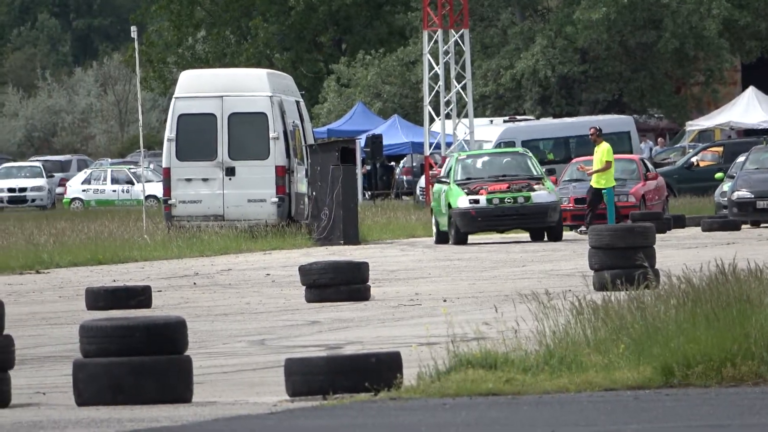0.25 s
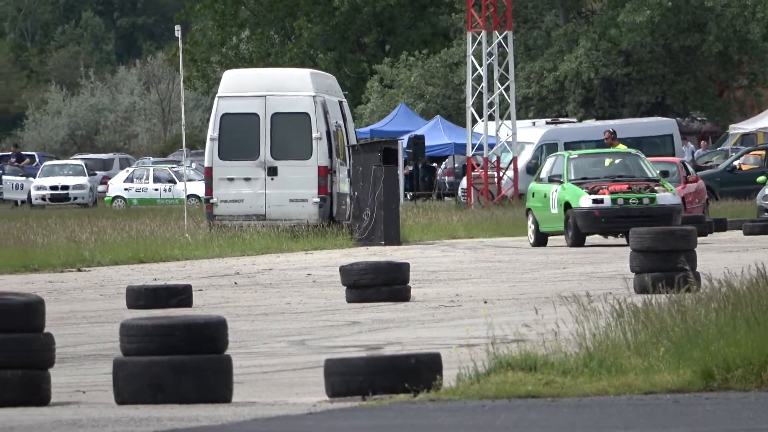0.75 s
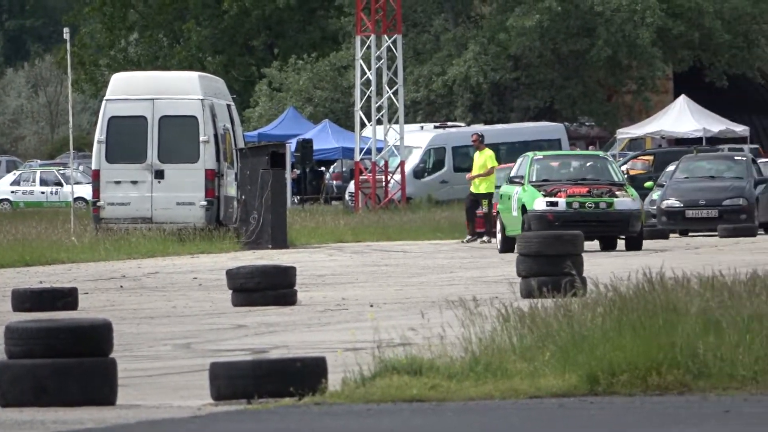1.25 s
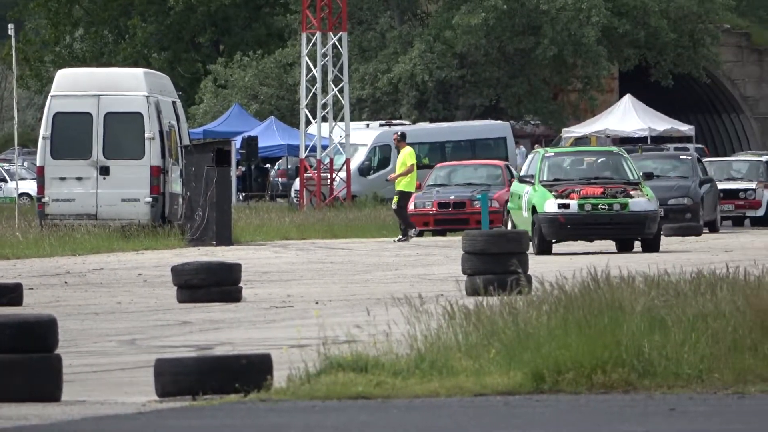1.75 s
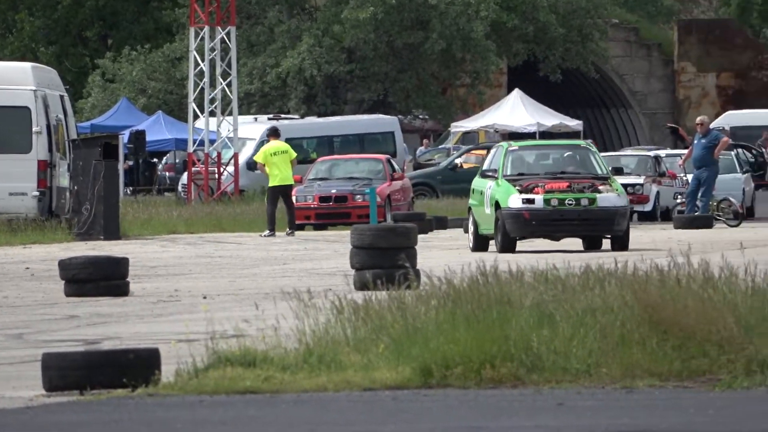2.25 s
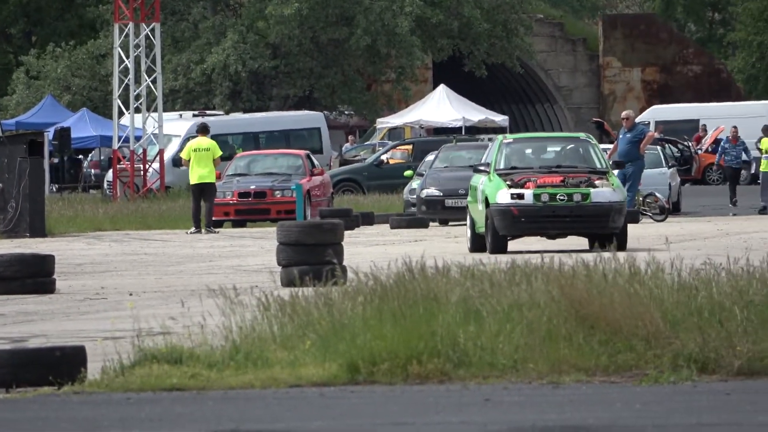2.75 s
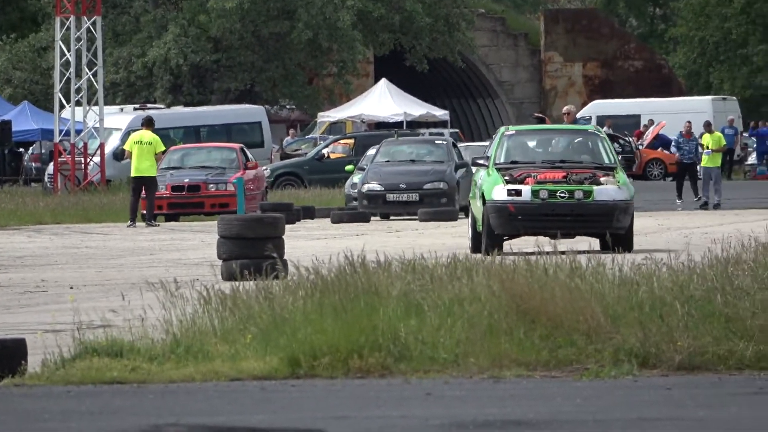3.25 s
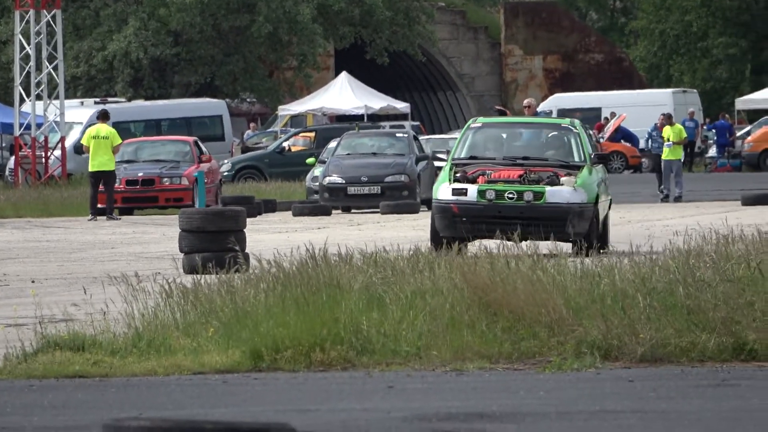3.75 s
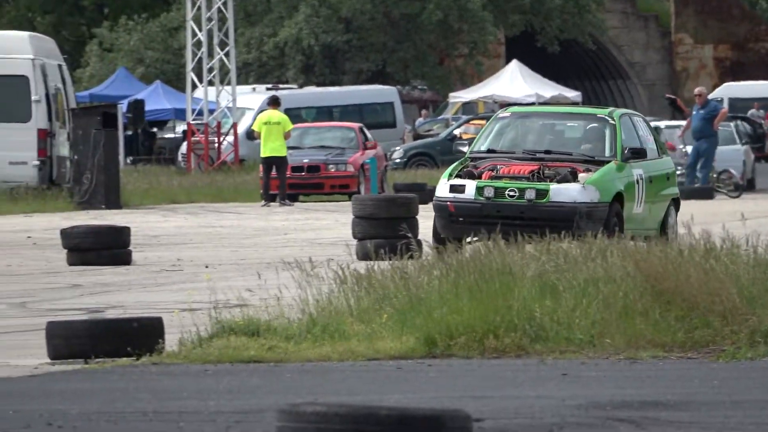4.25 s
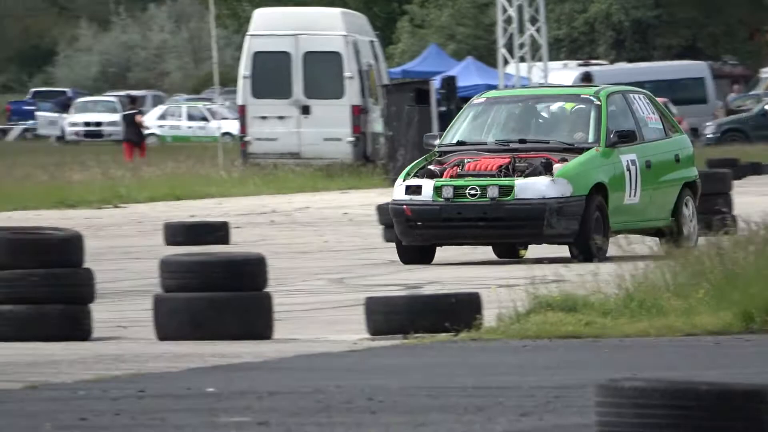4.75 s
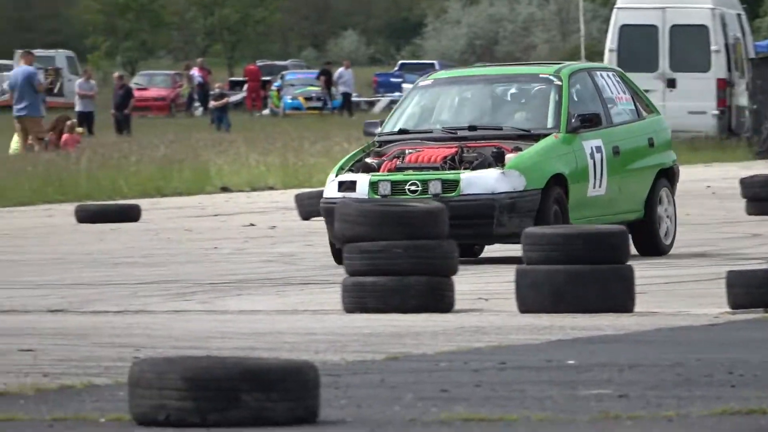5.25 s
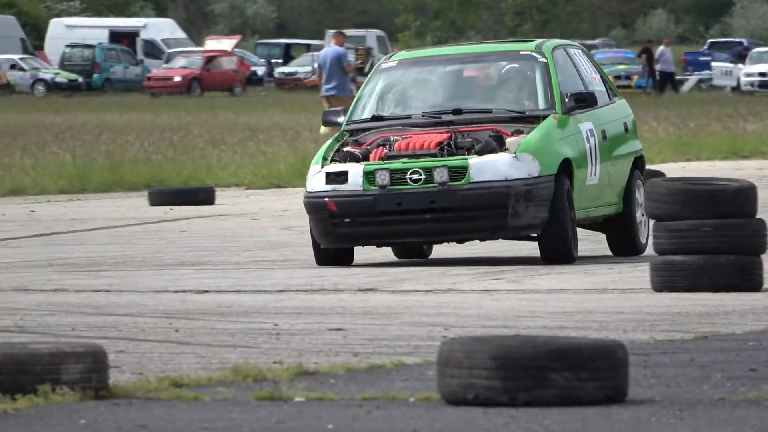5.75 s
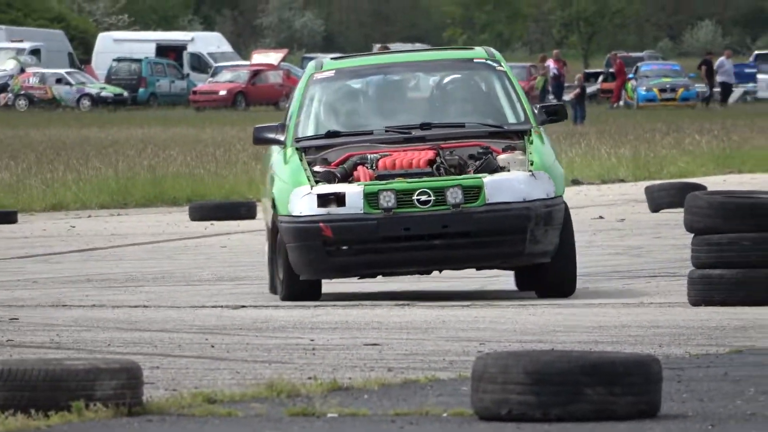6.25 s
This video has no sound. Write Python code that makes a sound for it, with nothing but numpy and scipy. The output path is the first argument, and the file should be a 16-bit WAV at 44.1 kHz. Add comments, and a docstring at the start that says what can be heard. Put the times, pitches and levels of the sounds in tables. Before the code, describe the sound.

Outdoors on an airfield, near-mono with slight stereo air: a raspy six-cylinder engine rises steadily, drops off, then accelerates again, much louder and fuller. After the lift it coasts nearer, its pitch falling unevenly, with gassy burble, valve clatter, air hiss and unsteady gear whine, broken by brief stabs of throttle. Idling engines rumble low behind; small bird chirps show in the quieter lull.

```python
"""Race car in a slalom

A six-cylinder race car pulls, lifts, pulls again with a loud boom, then coasts closer with whining gears.
The exhaust is built from sines locked to the engine, a comb of lines, pulses and puffs of filtered noise.
The engine bay is pulsing noise; the gears, a further car and idling engines are sines.
A small bird whistles in gliding sines, one click is a decaying step, and noise makes the airfield's rumble.
"""
import sys
import numpy as np
from scipy.fft import rfft, irfft, next_fast_len
from scipy.io import wavfile
from scipy.ndimage import map_coordinates

SR = 44100
rng = np.random.default_rng(int(sys.argv[2]) if len(sys.argv) > 2 else 0)


def store_pcm(level_fs):
    """Save levels as 16-bit WAV."""
    pcm = np.round(np.clip(level_fs, -1, 1) * 32767).astype(np.int16)
    wavfile.write(sys.argv[1], SR, np.atleast_2d(pcm).T)


N = 286650  # samples, 6.5 s


def amp(db):
    """Turn decibels into a plain gain."""
    return 10 ** (np.asarray(db) / 20)


def unit(x):
    """Scale x to an rms of 1."""
    return x / np.sqrt(np.mean(x ** 2) + 1e-20)


def since(s):
    """Seconds from s on, negative before it."""
    return np.arange(N) / SR - s


def curves(rows):
    """One value per sample for each column after the time, in straight lines between the rows."""
    s, *columns = np.transpose(rows)
    return [np.interp(np.arange(N) / SR, s, column) for column in columns]


def wobble(rate):
    """A smooth random curve with rate knots a second."""
    at = np.arange(N) * rate / SR
    coarse = at[::64]  # a smooth curve needs few points; straight lines fill the rest
    knots = rng.standard_normal(int(at[-1]) + 4)
    return np.interp(at, coarse, map_coordinates(knots, [coarse]))


def coloured(x, points):
    """Filter x with the (Hz, dB) gains so that nothing sounds before its cause, then set the rms to 1."""
    size = 2 * next_fast_len(N // 2 + 8192)
    hz, db = np.transpose(points)
    log_hz = np.log(np.fft.rfftfreq(size, 1 / SR) + 1)
    gain = amp(np.interp(log_hz, np.log(hz), db))
    # folding the cepstrum gives the filter minimum phase
    cepstrum = irfft(np.log(gain + 1e-6))
    cepstrum[1:size // 2] *= 2
    cepstrum[size // 2 + 1:] = 0
    response = np.exp(rfft(cepstrum))
    return unit(irfft(rfft(x, size) * response)[..., :N])


def tone(turns):
    """A sine of rms 1 that starts anywhere in its cycle."""
    return np.sqrt(2) * np.sin(2 * np.pi * (turns + rng.random()))


def puffs(firings, depth):
    """Noise that swells once per firing."""
    swell = np.exp(depth * np.cos(2 * np.pi * firings))
    return unit(rng.standard_normal(N) * swell)


def pulses(firings, cylinder_db, scatter_db, jitter=.035, count=3):
    """One pulse per firing; every cylinder has its own strength and burns a little early or late."""
    index = np.arange(1, int(firings[-1]))
    moment = index + jitter * rng.standard_normal(len(index))
    at = np.interp(moment, firings, np.arange(N)).astype(int)
    strength_db = np.array(cylinder_db)[index % count] + scatter_db * rng.standard_normal(len(index))
    return np.bincount(at, amp(strength_db), N)


# Engine speed. Each row: time in seconds, speed in engine cycles per second.
ENGINE_SPEED = [(0.0, 43.3), (0.25, 40.4), (0.49, 40.3), (0.76, 45.2), (0.92, 46), (1.54, 48.3),
                (2.01, 52.4), (2.23, 45.5), (2.41, 41.5), (2.51, 38.8), (2.7, 35.9), (2.84, 34.9),
                (3.48, 40.6), (4.09, 45.75), (4.67, 49.3), (4.82, 47), (5.1, 47.9), (5.3, 43.9),
                (5.47, 42.5), (5.92, 31.9), (6.17, 32.6), (6.5, 28.2)]
# Loudness of the engine bay, shared with the gears. Each row: time in seconds, relative level in dB.
BAY_LOUDNESS = [(0.3, -53.5), (0.97, -50.5), (1.04, -55), (1.44, -48.5), (2.25, -54.5), (2.68, -50),
                (2.94, -56), (3.65, -49), (4.18, -49), (4.75, -42.5), (4.88, -44.5), (5.39, -39),
                (6.0, -42.5), (6.5, -37.5)]


def race_car():
    """Every part of the car follows the engine's cycle of two crank turns, and the throttle."""
    cycle_hz, bay_db = curves(ENGINE_SPEED)[0], curves(BAY_LOUDNESS)[0]
    opening, even = throttle()
    cycles = np.cumsum(cycle_hz) / SR
    bank_firings = 3 * cycles  # three of the six cylinders make one bank
    pipe = exhaust(cycles, bank_firings, opening, even)
    return pipe + engine_bay(bank_firings, bay_db) + gears(cycles, cycle_hz, bay_db)


# Exhaust note, swelling and fading as the car turns and nears.
# Each row: time in seconds, relative level in dB.
NOTE_LOUDNESS = [(0.0, -17.5), (0.16, -14.5), (0.22, -22), (0.27, -14.5), (0.36, -21.5), (0.63, -16.5),
                 (0.74, -22.5), (1.07, -25.5), (2.01, -25.5), (2.04, -33.5), (2.68, -21.5), (3.29, -18),
                 (3.84, -9.5), (4.45, -11.5), (4.82, -20), (5.05, -17), (5.56, -19), (6.03, -29.5),
                 (6.3, -20), (6.5, -29.5)]
# The pipe's rasp. Each row: time in seconds, relative level in dB.
RASP_LOUDNESS = [(0.35, -44.5), (2.15, -42), (2.49, -36), (3.33, -38.5), (3.74, -33.5), (3.81, -37.5),
                 (4.63, -31.5), (4.77, -38.5), (5.4, -34), (6.5, -38)]


def exhaust(cycles, bank_firings, opening, even, bank_db=-0.66):
    """The open throttle booms; as it shuts, the note of one bank takes over and the pipe burbles."""
    note = amp(curves(NOTE_LOUDNESS)[0])
    rough = amp(curves(RASP_LOUDNESS)[0] - 1.4)
    pulling, snarl, bark = pick_ups()
    coasting = amp(bank_db) * note * np.cos(np.pi / 2 * opening)
    # hypot adds sounds by power; the fixed levels keep a little of each always present
    bank = np.hypot(coasting, amp(-37.5))
    boom = np.hypot(note * pulling, amp(-38.5))
    third = np.hypot(snarl, np.hypot(amp(-17.5) * coasting, amp(-8.5) * rough * even))
    burble = np.hypot(amp(-34.5), np.hypot(amp(-9.5) * coasting, amp(2) * bark))
    crackle = np.hypot(bark, amp(-14.5) * rough)
    tones = pipe_tones(cycles, bank, boom, third)
    return tones + rasp(cycles, bank_firings, even, rough, crackle, burble)


def pedal(s, length, travel_s=.07):
    """1 while the pedal is held, with a short travel at each end."""
    inside = np.minimum(since(s), -since(s + length))
    return np.clip(inside / travel_s + .5, 0, 1)


# Presses of the throttle, for the next two functions.
# Each row: start in seconds, length in seconds, opening from 0 to 1,
# evenness that the burning settles to from 0 to 1, boom in dB relative to the exhaust note
# before the opening scales it, snarl in dB before it rises and fades, bark in dB at its peak.
PRESSES = [(-1.02, 3.06, 1, .42, -1.8, -50, -61), (2.55, 2.23, 1, .88, -.3, -27, -37),
           (5.24, .38, .33, .08, -.5, -27.5, -40.5), (6.19, .21, .72, .12, -1.2, -24, -47)]


def throttle(settle_s=0.32, unsettle_s=0.28, coast_evenness=0.027):
    """The throttle's opening, and how evenly the engine burns: it settles under load, breaks up after a lift."""
    opening, even = np.zeros(N), np.zeros(N)
    for s, length, depth, settled, *_ in PRESSES:
        opening += depth * pedal(s, length)
        held, lifted = np.maximum(since(s), 0), np.maximum(since(s + length), 0)
        even += settled * (1 - np.exp(-held / settle_s)) * np.exp(-lifted / unsettle_s)
    return np.clip(opening, 0, 1), np.clip(even, coast_evenness, 1)


def pick_ups(snarl_rise_s=.12, snarl_fade_db_per_s=16.5, bark_lag_s=0.017, bark_width_s=0.22):
    """Gains of the boom, the flaring snarl and the bark around pick-up, for all throttle presses."""
    boom, snarl, bark = np.zeros(N), np.zeros(N), np.zeros(N)
    for s, length, depth, _, boom_db, snarl_db, bark_db in PRESSES:
        age, held = np.maximum(since(s), 0), pedal(s, length)
        boom += amp(boom_db) * np.sin(np.pi / 2 * depth) * held
        rise = np.minimum(age / snarl_rise_s, 1)
        snarl += amp(snarl_db - snarl_fade_db_per_s * age) * rise * held
        bark += amp(bark_db) * np.exp(-(since(s + bark_lag_s) / bark_width_s) ** 2)
    return boom, snarl, bark


def pipe_tones(cycles, bank_gain, boom_gain, third_gain, flutter_db=0.74, shake_db=1.1, overtone_db=-26):
    """Sines at one bank's firing rate, at that of all six cylinders, and at the bank's 3rd and 6th harmonics."""
    bank, boom, third, sixth = [tone(k * cycles) for k in (3, 6, 9, 18)]
    overtone = amp(overtone_db + 2.2 * wobble(8)) * sixth
    note = bank_gain * amp(shake_db * wobble(30)) * (bank + overtone)
    snarl = third_gain * amp(shake_db * wobble(30)) * third
    return boom_gain * amp(flutter_db * wobble(45)) * boom + note + snarl


# Colour of the bark. Each row: frequency in Hz, gain in dB.
BARK_COLOUR = [(250, -27), (480, -10.5), (660, 2), (820, 0), (1000, -8), (1250, -14.5), (1700, -16.5),
               (2300, -26.5), (4000, -61.5)]
# Colour of the puffing gas. Each row: frequency in Hz, gain in dB.
GAS_COLOUR = [(200, -23), (360, -4.5), (500, -2), (650, 0.5), (800, -3.5), (1020, -4.5), (1200, -17),
              (1500, -23.5), (2500, -44.5), (5000, -80.5)]
# Colour of the burble at the tailpipe. Each row: frequency in Hz, gain in dB.
BURBLE_COLOUR = [(40, -47.5), (85, -15), (130, 0.5), (190, 3), (260, -0.5), (360, -11), (480, -20),
                 (800, -63)]


def rasp(cycles, bank_firings, even, rasp_gain, bark_gain, burble_gain):
    """Even burning growls; uneven burning puffs gas, with bark pulses and a low burble on top."""
    shots = pulses(bank_firings, cylinder_db=[1, -1.5, .3], scatter_db=2.5)
    bark = bark_gain * coloured(shots, BARK_COLOUR)
    gas = amp(-1.0) * coloured(puffs(bank_firings, depth=0.28), GAS_COLOUR)
    burble = burble_gain * coloured(puffs(bank_firings, depth=0.87), BURBLE_COLOUR)
    steady = amp(5.5) * growl(cycles)
    return rasp_gain * (np.sqrt(even) * steady + np.sqrt(1 - even) * gas) + bark + burble


# Unequal cylinders fill the gaps between the main notes.
# Each row: multiple of the cycle rate, relative level in dB.
GROWL_LINES = [(4, -6.5), (5, 0), (7, -5), (8, -4), (10, -8), (11, -10), (12, -5.5), (13, -14), (14, -17),
               (15, -13), (16, -15.5), (17, -13), (18, -20), (19, -20), (20, -24), (21, -15), (22, -21.5),
               (23, -20.5), (24, -16.5), (25, -21.5), (27, -19)]
# Resonances of the pipe. Each row: frequency in Hz, gain in dB.
PIPE_COLOUR = [(100, -4.5), (200, 0), (330, 0.5), (420, -1), (490, 2.5), (580, 2), (700, -4.5), (820, 3.5),
               (1050, 3), (1200, -8.5), (1500, -27)]


def growl(cycles, drift_db=3, waver=0.027):
    """A dense comb of lines slides through the pipe's resonances, drifting in level and wavering in phase."""
    comb = np.zeros(N)
    for k, db in GROWL_LINES:
        comb += amp(db + drift_db * wobble(5)) * tone(k * cycles + waver * wobble(25))
    return coloured(comb, PIPE_COLOUR)


# Colour of the valve clatter. Each row: frequency in Hz, gain in dB.
CLATTER_COLOUR = [(700, -34.5), (1150, -9), (1350, 2.5), (1750, 3.5), (2100, 1), (2500, -5), (3000, -11),
                  (4000, -26), (6000, -46.5)]
# Colour of the air hiss. Each row: frequency in Hz, gain in dB.
HISS_COLOUR = [(2200, -24.5), (3300, 7), (4300, 3), (5000, -3), (5500, 1), (6400, -5.5), (7200, -2),
               (8000, -12.5), (11000, -18), (15500, -25.5)]
# Loudness of the air hiss. Each row: time in seconds, relative level in dB.
HISS_LOUDNESS = [(0.3, -72.5), (1.92, -67.5), (2.23, -74.5), (3.19, -72.5), (3.41, -67), (3.47, -69.5),
                 (4.57, -65), (4.67, -60), (4.76, -65), (5.38, -65.5), (5.89, -69.5), (6.46, -62.5),
                 (6.48, -67)]


def engine_bay(firings, bay_db):
    """Valve clatter and air hiss from the open engine bay: noise that swells slightly with each firing."""
    clatter_gain = amp(bay_db - 0.4 + 0.82 * wobble(30))
    clatter = clatter_gain * coloured(puffs(firings, depth=0.098), CLATTER_COLOUR)
    hiss_gain = amp(curves(HISS_LOUDNESS)[0] + 4.0 + .8 * wobble(18))
    return clatter + hiss_gain * coloured(puffs(firings, depth=0.13), HISS_COLOUR)


# Meshing gears. Each row: multiple of the cycle rate, level in dB relative to the engine bay
# before the casing and the overall trim.
GEAR_MESHES = [(41.55, -0.5), (62, -5), (83, -2)]
# Resonances of the gearbox casing. Each row: frequency in Hz, gain in dB.
CASING_COLOUR = [(1150, -4), (1280, 0.5), (1380, .5), (1520, -4), (1800, -2.5), (2050, -3.5), (2180, -7.5),
                 (2320, 2.5), (2450, -3.5), (2620, -10.5), (3200, -24), (4000, -33)]


def gears(cycles, cycle_hz, bay_db, flicker_db=2.5, backlash=.06, from_s=5.17, rise_s=.15):
    """On the long overrun, teeth whine unsteadily in step with the crank, swelling at casing resonances."""
    hz, casing_db = np.transpose(CASING_COLOUR)
    whine = np.zeros(N)
    for k, db in GEAR_MESHES:
        level_db = db + np.interp(k * cycle_hz, hz, casing_db) + flicker_db * wobble(22)
        whine += amp(level_db) * tone(k * cycles + backlash * wobble(60))
    fade_in = np.clip(since(from_s) / rise_s, 0, 1)
    return fade_in * amp(bay_db - 1.5) * whine


# The further car. Each row: time in seconds, boom frequency in Hz, level in dB.
FURTHER_CAR = [(0, 250, -36.5), (.45, 235, -28.5), (.62, 241.3, -31.5), (.85, 262, -27), (1.05, 265.1, -31),
               (1.6, 268, -33.5), (2, 285.3, -40.5), (2.6, 284.5, -60.5)]


def rival(overtone_db=-19):
    """A further car's boom, a sine and its octave, beats against the near one."""
    hz, db = curves(FURTHER_CAR)
    turns = np.cumsum(hz) / SR
    return amp(db) * (tone(turns) + amp(overtone_db) * tone(2 * turns))


# Bird notes. Each row: start in seconds, length in seconds, start, middle and end frequency in Hz,
# level in dB before the note's swell, rms trill depth in Hz (a minus sign flips the trill).
BIRD_NOTES = [(2.264, 0.036, 4050, 3770, 3920, -57, -2.5), (2.364, .03, 4800, 4100, 3250, -59.5, 0),
              (2.455, .03, 3190, 3300, 3340, -61, 2), (2.488, .03, 3850, 3750, 3630, -63.5, 0),
              (2.67, .115, 4450, 4161, 4420, -61, 202), (2.838, .02, 3090, 2990, 2960, -62, 0),
              (2.894, .025, 3350, 3100, 2830, -60, -2), (2.962, 0.067, 4522, 4150, 3634, -64.5, 114),
              (3.145, .075, 3230, 3400, 3290, -56.5, -1), (3.199, .072, 3350, 2960, 2800, -57.5, 1),
              (3.43, 0.025, 4170, 4100, 4050, -65.5, 1), (3.536, .1, 4070, 4300, 4620, -66, 112)]


def bird(trill_hz=150, unsteady=0.39):
    """Short whistles glide along a curve through three pitches, some with a buzzy, uneven trill."""
    out = np.zeros(N)
    trill = tone(trill_hz * np.arange(N) / SR + unsteady * wobble(120))
    for s, length, start_hz, middle_hz, end_hz, db, depth_hz in BIRD_NOTES:
        u = np.linspace(0, 1, int(length * SR), endpoint=False)
        span = slice(int(s * SR), int(s * SR) + len(u))
        glide = np.polyfit([0, .5, 1], [start_hz, middle_hz, end_hz], 2)
        hz = np.polyval(glide, u) + depth_hz * trill[span]
        swell = np.sqrt(np.sin(np.pi * u))
        out[span] += amp(db) * swell * tone(np.cumsum(hz) / SR)
    return out


def click(at_s=.1887, step_db=-15.5, relax_s=0.00082):
    """One sharp click: a sudden step that relaxes at once."""
    t = since(at_s)
    return -amp(step_db) * (t >= 0) * np.exp(-np.abs(t) / relax_s)


# Idling engines. Each row: frequency in Hz, level in dB before it lopes up and down.
IDLING_ENGINES = [(52.5, -48.5), (70, -41), (105, -38), (139, -46.5)]
# Colour of the airfield's rumble. Each row: frequency in Hz, gain in dB.
FIELD_COLOUR = [(20, -16.5), (35, -14.5), (55, -2), (85, -4.5), (130, -3.5), (220, -2), (400, -15.5),
                (1000, -27.5), (3000, -39.5), (6000, -53.5), (15000, -60.5)]


def paddock(hunt=0.11, lope_db=2.5, field_db=-37):
    """Idling engines, sines unsteady in level and phase, over the broad noise rumble of the airfield."""
    t = np.arange(N) / SR
    idle = np.zeros(N)
    for hz, db in IDLING_ENGINES:
        idle += amp(db + lope_db * wobble(14)) * tone(hz * t + hunt * wobble(5.6))
    return idle + amp(field_db) * coloured(rng.standard_normal(N), FIELD_COLOUR)


def side_air():
    """Faint air: unrelated filtered noise at each side."""
    colour = [(100, 0), (900, -5), (2000, -30.5), (6000, -29), (15000, -33.0)]  # Hz, dB
    return amp(-53.5) * coloured(rng.standard_normal((2, N)), colour)


def scene():
    """Everything in the middle, apart from the faint air at the sides."""
    return race_car() + rival() + bird() + click() + paddock() + side_air()


# Colour of the two microphone ports. Each row: frequency in Hz, left minus right in dB.
PORT_DIFFERENCE = [(25, -2), (70, 0), (140, 2), (270, 0.8), (380, 0.7), (500, -5.5), (680, -0.5),
                   (950, 0.5), (1300, 4), (1900, 1.26), (9000, -1.5)]


def record(dry, top_hz=15750):
    """The two microphone ports differ a little in colour, and nothing above the band limit is kept."""
    size = next_fast_len(N + 8192)
    hz = np.fft.rfftfreq(size, 1 / SR)
    port_hz, port_db = np.transpose(PORT_DIFFERENCE)
    difference_db = np.interp(np.log(hz + 1), np.log(port_hz), port_db)
    ports = amp(np.array([[.5], [-.5]]) * difference_db)  # half to each side
    return irfft(rfft(dry, size) * ports * (hz < top_hz), size)[..., :N]


dry = scene()
out = record(dry)
store_pcm(out)
```